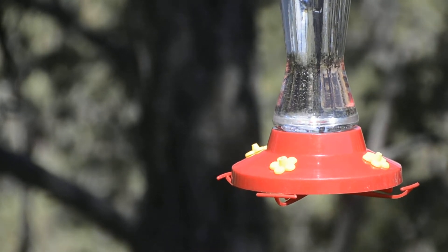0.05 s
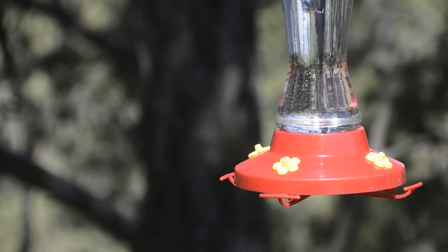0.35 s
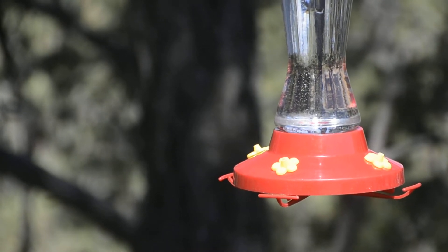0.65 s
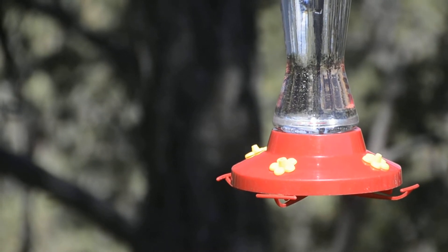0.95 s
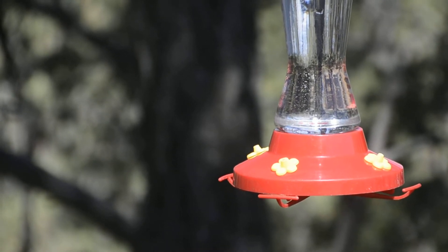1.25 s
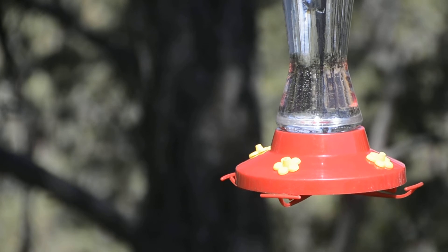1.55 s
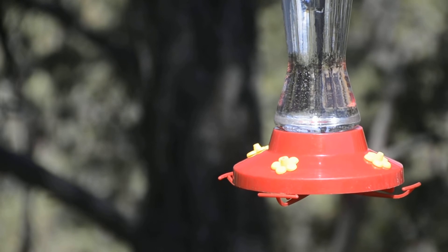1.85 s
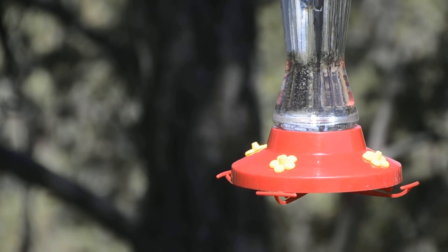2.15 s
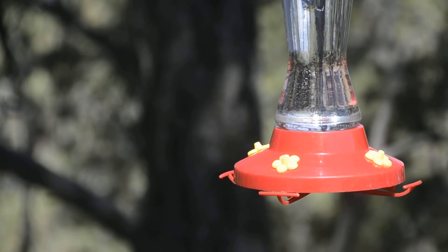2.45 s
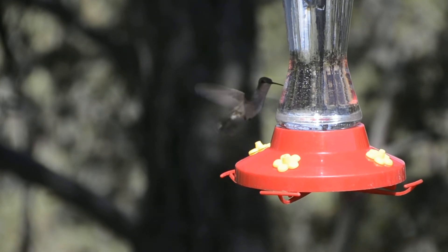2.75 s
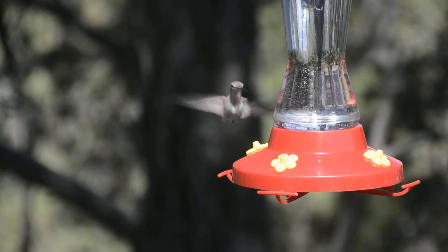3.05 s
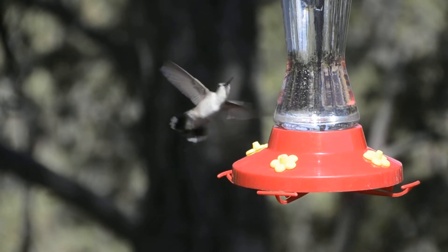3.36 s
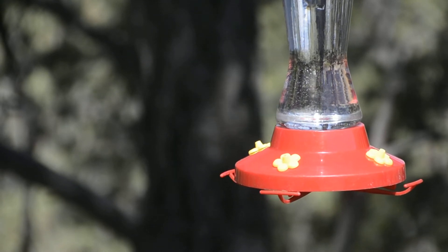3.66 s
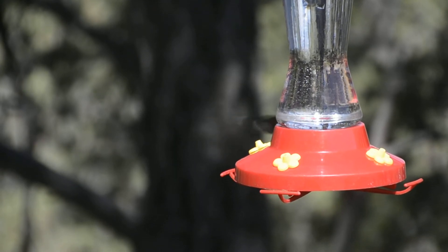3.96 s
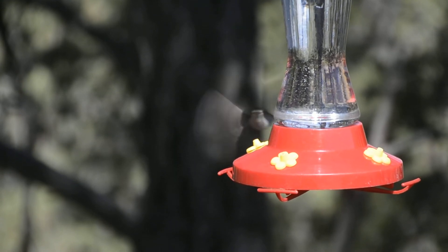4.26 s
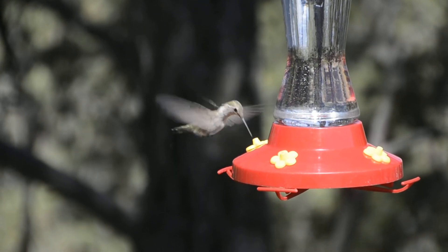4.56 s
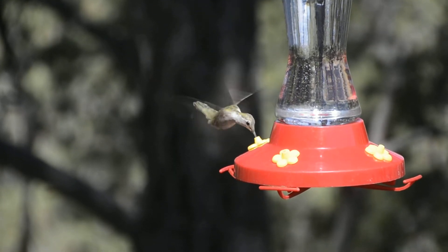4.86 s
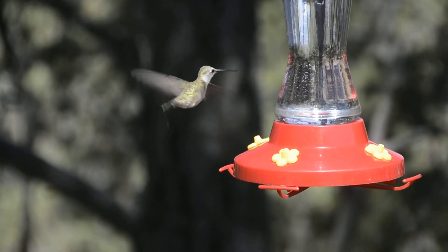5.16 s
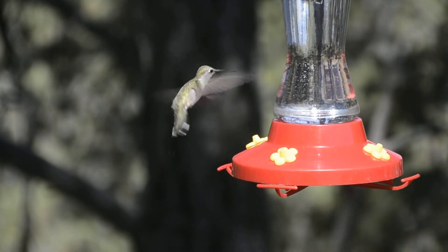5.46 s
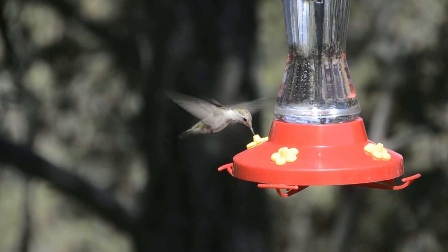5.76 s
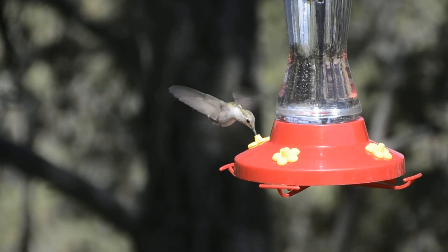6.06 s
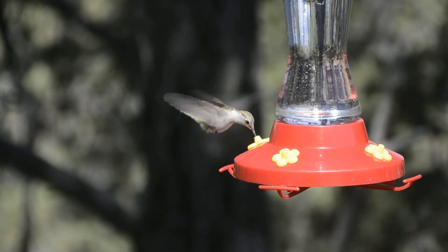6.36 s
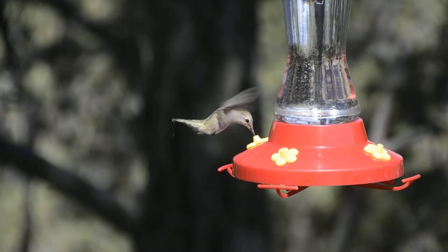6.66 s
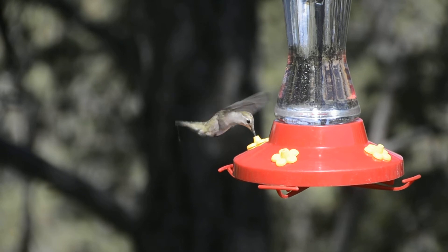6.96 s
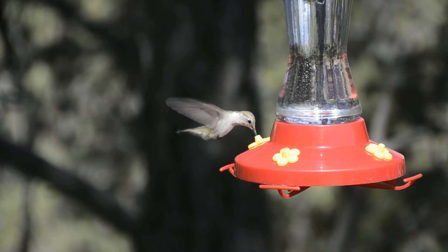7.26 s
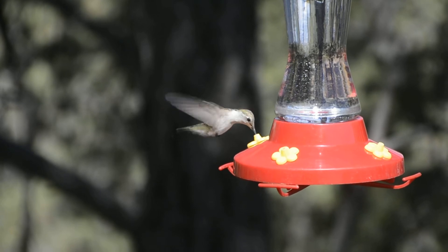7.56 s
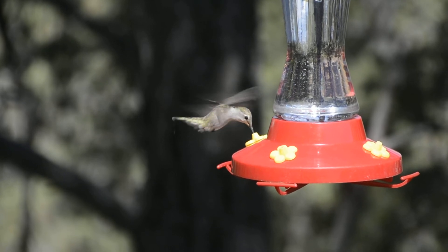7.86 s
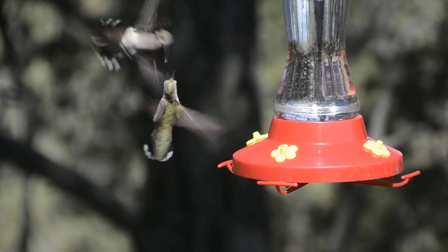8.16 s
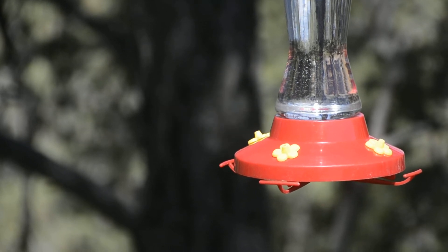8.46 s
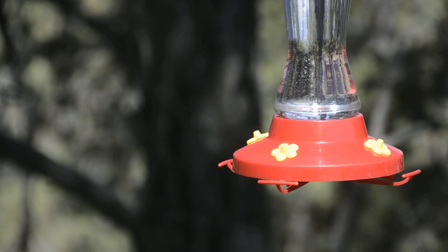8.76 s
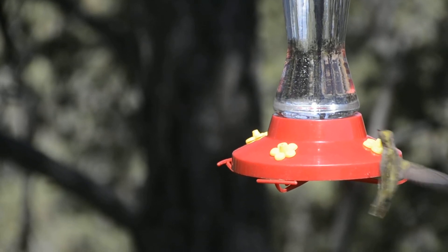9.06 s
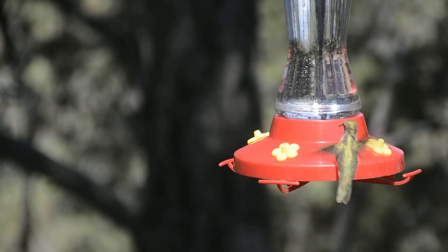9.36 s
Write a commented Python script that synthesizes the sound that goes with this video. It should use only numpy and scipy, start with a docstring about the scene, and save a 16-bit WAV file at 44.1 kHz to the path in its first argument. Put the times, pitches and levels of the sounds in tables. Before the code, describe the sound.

Over a soft rush of open air and a faint far-off motor, hummingbirds dart around a feeder close in front of the microphone. Their wings whistle in short, high trills and hum as they swoop and hover. Chips and twitters build into a squealing squabble, ease to trills and single chips, then flare again with feather flicks and scolding notes. The surrounding trees add a light echo.

```python
"""At a feeder among trees, hummingbirds squabble a few metres away.
A male's wing tips whistle once per wingbeat, which makes a trill; two rivals trill further off.
Wings push the air into a low hum and feathers crackle in sharp turns. The birds chip, twitter and
squeal at each other, and tree trunks scatter the sound. Behind it all are soft outdoor air, a faint
drone, far-off birds and a distant motor."""
import sys
import numpy as np
from scipy import signal
from scipy.fft import rfft, irfft
from scipy.io import wavfile
from scipy.ndimage import uniform_filter1d

SR = 44100
rng = np.random.default_rng(int(sys.argv[2]) if len(sys.argv) > 2 else 0)


def store_pcm(level_fs):
    """Save levels as 16-bit WAV."""
    pcm = np.round(np.clip(level_fs, -1, 1) * 32767).astype(np.int16)
    wavfile.write(sys.argv[1], SR, np.atleast_2d(pcm).T)


N = 418950
TIME = np.arange(N) / SR

# Levels in the tables are relative: the functions turn them up or down.
# bursts of trilling flight: (start [s], end [s], wingbeat rate [Hz], whistle pitch [Hz],
# first level [dB], last level [dB], extra level for the rivals [dB])
FLIGHT_BURSTS = [(0.014, 0.293, 47.4, 6440, -42.5, -53, -14.5),
                 (0.304, 0.507, 47.9, 6580, -49.5, -54.5, -6), (0.683, 0.8, 42.1, 6380, -48, -52, -30),
                 (0.827, 0.994, 41.7, 6310, -61, -61, -12), (1.046, 1.175, 45.6, 6480, -41, -52, -11),
                 (1.414, 1.52, 42.1, 6000, -51.5, -46.5, -6),
                 (1.534, 1.633, 42.15, 6280, -31.5, -36.5, -15),
                 (1.723, 2.034, 49.06, 6270, -39.5, -30, -6.5), (2.058, 2.232, 47.6, 6446, -27.5, -27, -12),
                 (2.25, 2.418, 45.4, 6424, -30.5, -26, -16.5),
                 (2.428, 2.539, 52.7, 6460, -29.5, -17, -12.5),
                 (2.564, 2.633, 46.3, 6130, -16.5, -27.5, -20), (2.694, 2.804, 46.2, 6077, -28, -26, -22),
                 (2.901, 3.034, 47.53, 6030, -46, -45, -3.5), (3.114, 3.307, 42.94, 6216, -34.5, -28, -9.5),
                 (3.482, 3.658, 48.7, 6164, -32.5, -31, -8), (3.773, 3.918, 47.1, 6080, -38, -29, -8),
                 (4.035, 4.168, 52.97, 6000, -45.5, -49, -4), (4.243, 4.385, 44.46, 6200, -33, -33, -10),
                 (4.444, 4.55, 51.5, 6130, -38, -33, -8), (4.665, 4.756, 46.65, 6110, -42, -50, -6),
                 (4.791, 4.948, 46.7, 6200, -37, -34, -11.5), (5.039, 5.183, 51.17, 6093, -38.5, -49, -3),
                 (5.277, 5.409, 44.94, 6140, -43, -46, -1.5), (5.491, 5.77, 44.85, 6410, -49, -39.5, -1.5),
                 (5.993, 6.174, 44.2, 6400, -42, -58.5, -16), (6.327, 6.66, 47.55, 6200, -39.5, -37, -6.5),
                 (6.913, 7.09, 47.1, 6174, -44, -38.5, -1.5), (7.264, 7.601, 41.8, 6120, -46, -43.5, 0),
                 (7.626, 7.958, 47.86, 6220, -42.5, -41.5, -2), (7.971, 8.252, 47.2, 6330, -44, -33.5, -1),
                 (8.262, 8.401, 45.88, 6237, -29, -42, -5.5), (8.439, 8.491, 44.9, 6230, -35.5, -36.5, -6),
                 (8.581, 8.779, 46.05, 6164, -41.5, -56, -4), (8.816, 9.09, 44.74, 6190, -48, -51, -6),
                 (9.226, 9.471, 47.14, 6087, -43, -48.5, -5.5)]
# shape of one whistle before stretching: (time from its peak [s], level [dB], pitch [ratio])
WHISTLE_SHAPE = [(-.005, -13, .99), (-.0025, -1, 1.002), (-.0005, 7, 1.008), (.0008, 6, .998),
                 (.0022, -3, .982), (.005, -13, .975)]
# tones in the push of a wing stroke: (frequency [multiple of the wingbeat rate], level [dB])
HUM_TONES = [(1, -38), (2, -6), (3, -7.5), (4, 1.5), (5, -1), (6, 0), (7, -2.5), (8, -5), (9, -8.5),
             (10, -5.5), (11, -9), (12, -18)]
# swoops past the listener: (time when nearest [s], hum level [dB], half length [s])
SWOOPS = [(1.58, -58, 0.077), (2.06, -59.5, 0.21), (2.531, -53.5, 0.17), (2.744, -53.5, 0.058),
          (5.63, -55.5, .12), (7.723, -63, .1), (8.298, -58.5, 0.25), (8.782, -57, 0.1), (9.381, -58, 0.17)]
# runs of falling chips: (first chip [s], last chip [s], level [dB], fall time [s], overtone step [dB])
CHIP_RUNS = [(0.134, 0.134, -48.5, 0.013, -10), (0.412, 0.497, -53, 0.014, -5),
             (0.858, 0.859, -46, 0.0095, -2), (0.894, 0.894, -48, 0.016, -8.5),
             (1.103, 1.104, -42.5, 0.0093, -2.5), (1.483, 1.578, -39, 0.0083, -4),
             (2.019, 2.106, -41, 0.0068, -6), (2.333, 2.333, -43.5, 0.0091, -11),
             (2.458, 2.458, -48.5, 0.016, -12), (2.5, 2.499, -47, 0.0066, 2),
             (3.041, 3.141, -35, 0.0089, 1.5), (3.676, 3.737, -52.5, .009, -2),
             (3.831, 3.933, -41, 0.0088, -3.5), (4.073, 4.147, -56, .012, -10),
             (4.273, 4.531, -41, .0105, -0.5), (4.836, 4.921, -43.5, .011, -3),
             (5.109, 5.109, -50, 0.011, -4), (5.44, 5.524, -53, 0.015, -2), (5.564, 5.564, -45.5, .01, -17),
             (5.719, 5.719, -46.5, .013, -1), (5.996, 5.996, -47.5, .012, -2.5),
             (6.563, 6.563, -51, .019, -4), (7.092, 7.092, -45.5, 0.0089, -9),
             (7.392, 7.392, -47, 0.013, -10), (7.718, 7.718, -40.5, 0.0077, -8),
             (7.957, 8.046, -51.5, 0.014, 1.5), (8.531, 8.531, -43, 0.01, -10),
             (9.002, 9.002, -44, .0097, -11)]
# how the throat shapes a chip's loudness: (pitch [Hz], level [dB])
THROAT_RESPONSE = [(2400, 13), (2900, -13), (3500, -5), (4300, 0), (5200, -1), (6500, -2), (8500, 9),
                   (10000, -25)]
# quick arches of pitch: (time of the top [s], top pitch [Hz], half length [s], level [dB])
TWITTERS = [(1.25, 10300, 0.006, -43.5), (1.264, 10000, 0.0067, -45.5), (1.2724, 8140, 0.0054, -43),
            (1.324, 10200, 0.0062, -42), (1.3335, 8800, 0.0051, -44), (2.498, 9470, 0.0046, -37),
            (2.544, 10000, 0.0073, -32), (2.554, 8200, 0.0059, -43), (2.607, 9400, 0.0089, -35.5),
            (2.868, 9040, 0.0097, -52), (2.936, 8710, 0.016, -52.5), (8.24, 10500, 0.0048, -50),
            (8.255, 10500, 0.0047, -50)]
# quarrels filled with faint twitters: (start [s], end [s])
QUARRELS = [(2.68, 5.3), (8.149, 8.5)]
# held squeals: (start [s], length [s], start pitch [Hz], level [dB], overtone step [dB])
SQUEALS = [(3.029, 0.21, 1904, -60.5, -1), (3.209, 0.048, 1900, -52.5, -17), (3.272, .045, 1920, -54.5, -3),
           (3.339, 0.044, 1916, -48, -8), (3.379, 0.038, 2266, -48, -1.5), (3.409, 0.051, 1896, -46.5, -17),
           (3.44, 0.03, 2336, -47.5, 1.5), (3.479, 0.071, 1871, -44, -13.5), (3.566, 0.049, 1780, -55, -2),
           (8.171, .022, 2578, -49, -5.5), (8.73, 0.053, 6070, -50, 3), (9.336, .162, 4350, -61.5, -21)]
# short scolding notes: (start [s], start pitch [Hz], level [dB])
SCOLDS = [(3.459, 2260, -51.5), (3.8, 2485, -49.5), (3.874, 3343, -51), (3.934, 2610, -50),
          (4.003, 3000, -48.5), (8.142, 4096, -53.5), (8.258, 2733, -55), (9.09, 3840, -53),
          (9.151, 3840, -50), (9.219, 3735, -53.5), (9.273, 2377, -50.5), (9.315, 3405, -55)]
# flicks of feathers in sharp turns: (time [s], level [dB], fade time [s])
FEATHER_FLICKS = [(2.981, -43, 0.0054), (3.001, -48.5, 0.037), (3.645, -53, 0.0031), (3.694, -41, 0.0032),
                  (8.178, -46.5, 0.0066), (8.14, -52.5, 0.041), (8.21, -51.5, 0.057), (8.305, -53, 0.048),
                  (8.356, -39.5, 0.0028), (8.38, -56, 0.042)]
# tone colour of the outdoor air: (frequency [Hz], level [dB])
AIR_SPECTRUM = [(20, -35), (50, -17), (100, -9.5), (250, -7), (600, -3.5), (950, -3.5), (1500, -6.5),
                (2100, -7.5), (4000, -13.5), (7500, -18), (10000, -25.5), (15500, -32)]
# bands of noise in the distant drone: (centre [Hz], width [Hz], level [dB])
DRONE_BANDS = [(1120, 77.5, -57), (1417, 145, -62)]
# slow swell of the drone: (time [s], level [dB])
DRONE_SWELL = [(0, -4.5), (2, 0.5), (9.5, -0.5)]

CALL_BASE_HZ = 2700  # chips fall toward this pitch and twitters rise from it


def trills(male_db=-2, feeder_echo_db=-7, rival_db=-4, rival_rates_hz=(46, 51)):
    """Each downstroke of the male whistles, and a faint, slightly detuned echo off the feeder follows just
    after; two rivals keep their own pace."""
    male, rivals = np.zeros(N), np.zeros(N)
    rival_beats = np.concatenate([np.arange(0, N / SR, 1 / hz) for hz in rival_rates_hz])
    next_starts = [burst[0] for burst in FLIGHT_BURSTS[1:]] + [N / SR]
    for burst, next_start in zip(FLIGHT_BURSTS, next_starts):
        start, end, rate, *_, extra_db = burst
        stop = min(end + .06, next_start - .5 / rate)  # a few more beats as the burst dies away
        for s in np.arange(start, stop, 1 / rate):
            hz, db = wing_effort(burst, s)
            db += male_db
            longer, louder, higher, later, echo_higher = rng.standard_normal(6)[:5]
            stretch = np.exp(.2 * longer)
            onset = s + WHISTLE_SHAPE[0][0] * stretch
            add(male, onset, undb(db + louder) * whistle(hz * (1 + .005 * higher), stretch))
            feeder_echo = whistle(hz * (1 + .015 * echo_higher), stretch=.63)
            add(male, onset + .003 + .003 * later, undb(db + feeder_echo_db) * feeder_echo)
        for s in rival_beats[(rival_beats >= start) & (rival_beats < stop)]:
            hz, db = wing_effort(burst, s)
            louder, later, higher = rng.standard_normal(3)
            gain = undb(db + rival_db + extra_db + 2 * louder)
            add(rivals, s + .0027 * later, gain * whistle(hz * (1 + .02 * higher), stretch=1.43))
    return male, rivals


def wing_effort(burst, s, hz_per_db=15.5, arch_hz=87.5):
    """Pitch and level of the wingbeat at time s: harder strokes whistle higher."""
    start, end, _, hz, first_db, last_db, _ = burst
    progress = np.clip((s - start) / (end - start), 0, 1)
    db = first_db + (last_db - first_db) * progress
    db -= .5 * max(1 - (s - start) / .025, 0)  # a slightly softer start
    db -= 31 * max(s - end, 0) / .06  # a quick fade after the end
    arch = np.sin(np.pi * progress) - 2 / np.pi  # the pitch lifts in the middle of a burst
    return hz + hz_per_db * (db - (first_db + last_db) / 2) + arch_hz * arch, db


def whistle(hz, stretch, octave_db=-38):
    """One wing stroke: the narrow tip feather flutters unsteadily, rising and sagging in pitch."""
    t = np.arange(WHISTLE_SHAPE[0][0], WHISTLE_SHAPE[-1][0], 1 / SR / stretch)
    db, bend = curve(WHISTLE_SHAPE, t)
    flutter = 1 + .018 * wobble(t, points=9)
    swell = uniform_filter1d(undb(db) * signal.windows.tukey(len(t), .5), size=30, mode="constant")
    phase = phase_of(hz * bend * flutter) + rng.uniform(0, 2 * np.pi)
    return np.sqrt(2) * swell * (np.sin(phase) + undb(octave_db) * np.sin(2 * phase))


def wing_hum(hum_db=-2, eddies_db=-5):
    """Wing strokes push a low hum out of the air, and swirls of air pulse with each beat."""
    starts, _, rates, *_ = np.transpose(FLIGHT_BURSTS)
    darting = 1 + .045 * wander(7)
    phase = phase_of(np.interp(TIME, starts, rates) * darting)
    hum = sum(undb(db + 2 * wander(12)) * np.sin(multiple * phase + rng.uniform(0, 2.39))
              for multiple, db in HUM_TONES)
    eddies = band(285, 390) * (1 + np.sin(phase))
    return undb(hum_db) * nearness() * (unit(hum) + undb(eddies_db) * eddies)


def nearness(hover_db=-66.5, arrival_s=3.1):
    """Strength of the hum: it grows as the birds arrive to hover, and swells with each swoop."""
    hover = undb(hover_db) * np.minimum(TIME / arrival_s, 1) ** 2
    swoops = [undb(db) / (1 + ((TIME - s) / half_s) ** 4) for s, db, half_s in SWOOPS]
    return np.sqrt(hover ** 2 + sum(swoop ** 2 for swoop in swoops))


def feather_hiss(trill, hiss_db=-25):
    """Air hisses through the feathers with each whistle."""
    strength = np.sqrt(np.abs(uniform_filter1d(trill ** 2, size=600)))
    return undb(hiss_db) * strength * band(6800, 1300)


def chips(chip_db=-1, far_db=-63, gap_s=.087):
    """Runs of chips from the quarrel, and faint single ones from birds waiting in the trees."""
    out = np.zeros(N)
    far = [(s, far_db + 2 * rng.standard_normal(), rng.uniform(.012, .013), -4)
           for s in rng.uniform(0, N / SR, size=14)]
    near = [(s, *shape) for first, last, *shape in CHIP_RUNS
            for s in np.linspace(first, last, 1 + round((last - first) / gap_s))]
    for s, db, fall_s, overtone_db in near + far:
        offset_s, sound = chip(fall_s, overtone_db)
        add(out, s + offset_s, undb(db + chip_db) * sound)
    return out


def chip(fall_s, overtone_db, passing_hz=4200):
    """The pitch drops fast and levels out, while the throat's resonance shapes the loudness."""
    t = np.arange(-1.15 * fall_s, fall_s * rng.uniform(1.4, 2.1), 1 / SR)
    hz = CALL_BASE_HZ + (passing_hz - CALL_BASE_HZ) * np.exp(-t / fall_s)
    hz += rng.normal(-80, 68) * np.maximum(t, 0) / fall_s  # no two chips end alike
    throat_db, = curve(THROAT_RESPONSE, hz)
    gain = undb(throat_db + 2.5 * wobble(t, points=12)) * signal.windows.tukey(len(t), .25)
    return t[0], voice(hz, gain, overtone_db, rasp=.02)


def twitters():
    """The voice shoots up and back down in pitch, growing loud near the top."""
    out = np.zeros(N)
    for s, top_hz, half_s, db in list(TWITTERS) + faint_twitters():
        arch = np.hanning(int(2 * half_s * SR))
        hz = CALL_BASE_HZ + (top_hz - CALL_BASE_HZ) * arch
        swell = np.interp(np.linspace(0, 1, len(arch)), [.12, .4, .8, 1], [.14, 1, 1, .47])
        add(out, s - half_s, voice(hz, undb(db) * swell, overtone_db=-9, rasp=.043))
    return out


def faint_twitters(gap_s=.08, top_hz=8500, half_s=.01, db=-54):
    """Extra twitters, unevenly spaced through each quarrel, as rows like those of TWITTERS."""
    times = np.concatenate([np.arange(start, end, gap_s) for start, end in QUARRELS])
    chance = rng.standard_normal((len(times), 4)) * [.03, .1, .25, 3]
    return [(s + later, top_hz * np.exp(higher), half_s * np.exp(longer), db + louder)
            for s, (later, higher, longer, louder) in zip(times, chance)]


def squeals(squeal_db=-2, hiss_db=-10):
    """A strained, hissy voice: held notes that sag, scolds that drop and one stutter of rising notes."""
    held = [(s, length_s, hz, hz * .94, db, overtone_db) for s, length_s, hz, db, overtone_db in SQUEALS]
    scolds = [(s, .023, hz, hz * .6, db, -3) for s, hz, db in SCOLDS]
    stutter = [(s, .009, 3900, 5800, -51, 2) for s in np.arange(8.823, 8.882, .0175)]
    out, strain = np.zeros(N), np.zeros(N)
    for s, length_s, from_hz, to_hz, db, overtone_db in held + scolds + stutter:
        progress = np.linspace(0, 1, int(length_s * SR))
        gain = undb(db + squeal_db) * signal.windows.tukey(len(progress), .6)
        hz = from_hz + (to_hz - from_hz) * progress ** 1.3
        add(out, s, voice(hz, gain, overtone_db, rasp=np.clip(110 / from_hz, .035, .05)))
        add(strain, s, gain)
    out *= undb(3.6 * wander(200))  # the strained voice breaks up
    return out + undb(hiss_db) * strain * band(4300, 3300)


def voice(hz, gain, overtone_db, rasp):
    """A thin bird voice: four tones in level steps of overtone_db; rasp makes the pitch tremble."""
    tremble = unit(uniform_filter1d(rng.standard_normal(len(hz)), size=24))
    phase = phase_of(hz * (1 + rasp * tremble))
    tones = 0
    for k in range(1, 5):
        treble_cut = (k * hz < SR / 2) / np.sqrt(1 + (k * hz / 9700) ** 16)
        tones += undb(overtone_db * (k - 1)) * np.sin(k * phase) * treble_cut
    return np.sqrt(2) * gain * tones


def feather_flicks(crackle_db=4):
    """Feathers knock and crackle in short bursts, mostly in the middle range."""
    gain = np.zeros(N)
    t = np.arange(SR // 4) / SR
    for s, db, fade_s in FEATHER_FLICKS:
        add(gain, s, undb(db) * np.exp(-t / fade_s))
    gain *= undb(crackle_db * (wander(500) - .5))
    return gain * (band(1700, 1500) + undb(-7) * band(6500, 2200))


def among_trees(sound, early_db, late_db, early_s=.015, late_s=.15, gap_s=.0031):
    """Trunks add a few early echoes and a thin fading tail to a sound, different in each ear."""
    t = np.arange(SR * 3 // 5) / SR
    ears = []
    for _ in range(2):
        early = unit(rng.standard_normal(len(t)) ** 3 * np.exp(-t / early_s) * (t > gap_s))
        late = unit(rng.standard_normal(len(t)) * np.exp(-t / late_s) * (t > early_s))
        echo = (undb(early_db) * early + undb(late_db) * late) / np.sqrt(len(t))
        ears.append(sound + signal.fftconvolve(sound, echo)[:N])
    return np.array(ears)


def outdoor_air(level_db=-56):
    """The soft rush of open air, gently rising and falling."""
    hz, db = np.transpose(AIR_SPECTRUM)
    colour_db = lambda f: np.interp(np.log(f), np.log(hz), db)
    # both ears hear the upper bass much alike
    apart_db = lambda f: np.interp(f, [30, 70, 150, 450], [18, -7, .5, 4.5])
    common = noise(lambda f: undb(colour_db(f)))
    side = noise(lambda f: undb(colour_db(f) + apart_db(f)))
    return undb(level_db + 1.5 * wander(3.05)) * stereo(common, side, side_db=-4)


def distant_drone():
    """Two narrow bands of rushing noise swell at first, then waver."""
    out = np.zeros((2, N))
    swell_db, = curve(DRONE_SWELL, TIME)
    for hz, width_hz, db in DRONE_BANDS:
        gain = undb(db + swell_db + 1.6 * wander(6.5))
        out += gain * stereo(band(hz, width_hz), band(hz, width_hz), side_db=-10)
    return out


def far_trills(level_db=-63):
    """The trills of far-off birds blur into a high hiss that comes and goes."""
    return undb(level_db + 3.5 * wander(6.7)) * stereo(band(6350, 550), band(6200, 450), side_db=-4)


def motor(hz=592, level_db=-69):
    """A faint steady tone from a far-off motor, barely wavering."""
    phase = phase_of(hz + 2.5 * wander(12))
    return np.sqrt(2) * undb(level_db + wander(2.27)) * np.sin(phase)


def undb(db):
    """Turn decibels into a number to multiply by."""
    return 10 ** (np.asarray(db) / 20)


def unit(x):
    """Scale a sound to an average power of 1."""
    return x / np.sqrt(np.mean(x ** 2) + 1e-18)


def curve(table, at):
    """Look up values between a table's rows, along straight lines."""
    first, *columns = np.transpose(table)
    return [np.interp(at, first, column) for column in columns]


def add(track, start_s, sound):
    """Mix a sound into a track."""
    i = int(start_s * SR)
    lo, hi = max(i, 0), min(i + len(sound), N)
    if hi > lo:
        track[lo:hi] += sound[lo - i:hi - i]


def phase_of(hz):
    """The running angle of a wave whose pitch moves."""
    return 2 * np.pi * np.cumsum(hz) / SR


def wander(rate_hz):
    """A slow or fast random drift, about 1 in size."""
    step = max(int(SR / rate_hz), 1)
    points = rng.standard_normal(N // step + 2)
    return np.interp(TIME * SR / step, np.arange(len(points)), points) * np.sqrt(3 / 2)


def wobble(t, points):
    """A line through a few random points across one note."""
    return np.interp(t, np.linspace(t[0], t[-1], points), rng.standard_normal(points))


def noise(gain):
    """Noise whose strength at each frequency is set by gain(Hz)."""
    hz = np.fft.rfftfreq(N, 1 / SR) + 1
    return unit(irfft(rfft(rng.standard_normal(N)) * gain(hz), N))


def band(hz, width_hz):
    """Noise gathered around one frequency."""
    return noise(lambda f: 1 / (1 + ((f / hz - hz / f) * hz / width_hz / 2) ** 2 * 2))


def stereo(common, side, side_db):
    """Make left and right: the side part is added in one ear and taken away in the other."""
    return (common + undb(side_db) * side * np.array([[1], [-1]])) / np.sqrt(1 + undb(2 * side_db))


def scene():
    """The birds are straight ahead; the rivals and the squealer, further off, have more echo."""
    male, rivals = trills()
    wings = among_trees(male + wing_hum() + feather_hiss(male), early_db=-11.5, late_db=-19.5)
    quarrel = among_trees(chips() + twitters() + feather_flicks(), early_db=-5, late_db=-15.5)
    further_off = among_trees(rivals + squeals(), early_db=-5, late_db=-8)
    return wings + quarrel + further_off + outdoor_air() + distant_drone() + far_trills() + motor()


def record(dry):
    """Cut away the very highest treble, above 15600 Hz."""
    return signal.sosfilt(signal.ellip(10, .1, 70, 15600, fs=SR, output="sos"), dry)


dry = scene()
out = record(dry)
store_pcm(out)
```